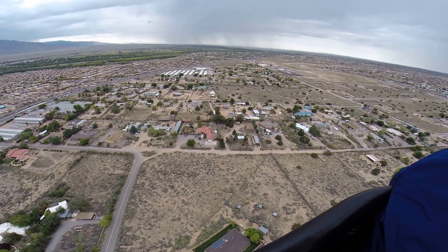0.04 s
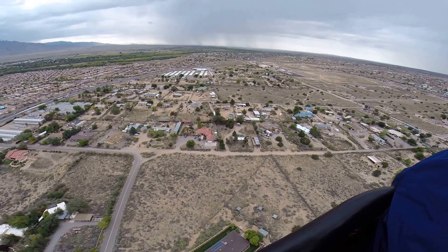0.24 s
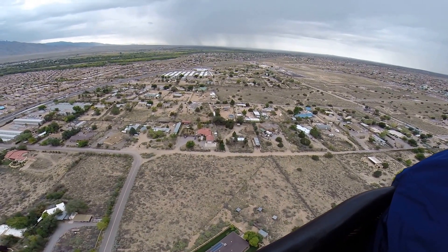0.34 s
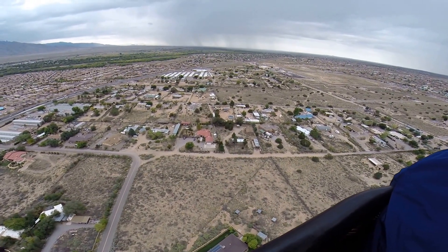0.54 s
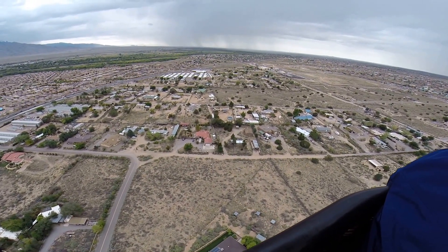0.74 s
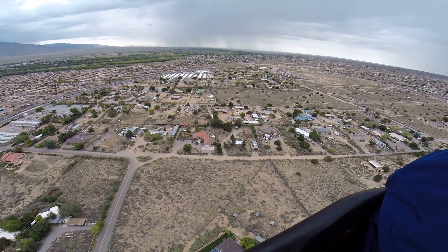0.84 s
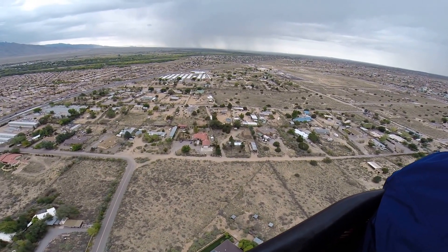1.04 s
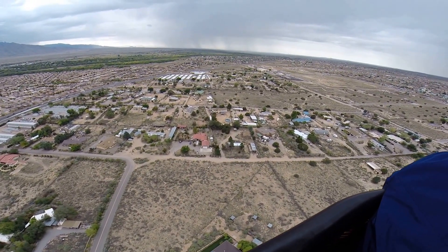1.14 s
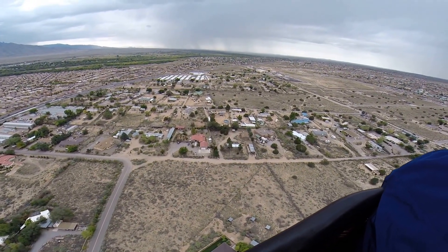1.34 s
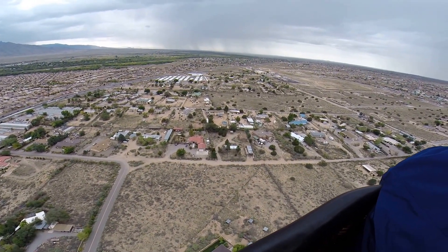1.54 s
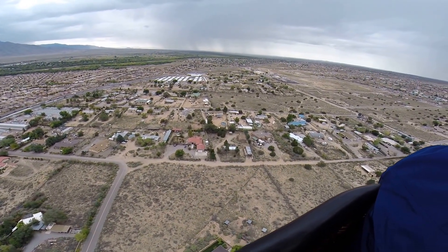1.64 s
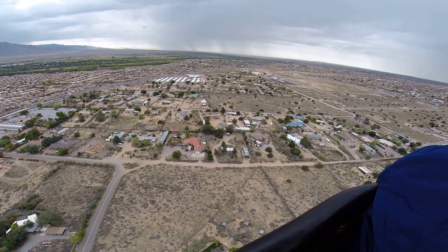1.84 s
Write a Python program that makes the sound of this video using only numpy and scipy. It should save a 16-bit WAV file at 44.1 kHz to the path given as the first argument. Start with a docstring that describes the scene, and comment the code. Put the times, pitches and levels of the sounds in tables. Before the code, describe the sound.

A balloon's propane burner catches with a deep whump after a brief soft rush, roars and hisses for just over a second, then shuts off, leaving quiet air; close microphone, outdoors high above open land.

```python
"""The propane burner of a hot-air balloon fires one blast above the basket, in open air.
First only the soft rush of pilot flame and air: flickering noise bands with low gusts. The valve opens and
the gas catches with a deep whump, pushes ringing in low modes. A turbulent flame roars (resonant noise), billows
(low noise) and booms (a wavering sine) under the jets' hiss (treble noise) until the valve shuts.
The soft rush is left, with a low gust and a faint rustle."""
import sys
import numpy as np
from scipy import signal
from scipy.io import wavfile

SR = 44100
rng = np.random.default_rng(int(sys.argv[2]) if len(sys.argv) > 2 else 0)


def wav_out(sig):
    """Save sig, one row per channel (or a flat mono array), as 16-bit PCM at SR to the path in sys.argv[1]."""
    wavfile.write(sys.argv[1], SR, np.round(np.clip(np.atleast_2d(sig).T, -1, 1) * 32767).astype(np.int16))


N = 83790   # samples, 1.9 s

# Spectrum of the roar. Each row: frequency in Hz, relative density in dB per Hz.
ROAR_SPECTRUM = [(60, -17), (95, -4.5), (140, 0), (280, -4.5), (450, -6), (700, -14), (950, -18),
                 (1250, -21.5), (2000, -32.5), (2500, -38), (4000, -41)]
# Peaks and dips from burner frame and basket. Each row: frequency in Hz, width in Hz, boost in dB.
FRAME_RESONANCES = [(138, 14, 1.5), (177, 32, 3.5), (222.7, 17, -11.5), (286, 49, 6), (341, 26.5, -6),
                    (368.3, 21.6, 5), (564, 12, 3), (645, 45, -4.5), (885, 120, 2.5), (1034, 60, -2),
                    (1401, 76, -3), (1420, 65, 2.5), (2020, 280, 4.5)]
ROAR_TRIM_DB, ROAR_PATCHY_DB = 1, 0
ROAR_FLUTTER_DB, ROAR_FLUTTER_HZ = 0.7, 37.7
ROAR_TILT_DB_PER_OCTAVE_PER_DB, ROAR_PIVOT_HZ = 0.099, 300


def roar(flame_db, flow_db):
    """Turbulent burning, brighter at high flow, coloured by resonances and reflections, fluttering as a whole."""
    tilt_db = ROAR_TILT_DB_PER_OCTAVE_PER_DB * excess(flow_db)
    burn = turbulence(ROAR_SPECTRUM, ROAR_PATCHY_DB, tilt_db, ROAR_PIVOT_HZ)
    burn = colour(burn, FRAME_RESONANCES)
    flutter_db = ROAR_FLUTTER_DB * drift(ROAR_FLUTTER_HZ)
    return rms_one(reflect(burn)) * from_db(ROAR_TRIM_DB + flame_db + flutter_db)


# Swells of the flame's lowest resonance. Each row: centre in seconds, length in seconds, peak level in dB rms.
BOOM_SWELLS = [(0.41, 0.057, -14), (0.604, 0.36, -24.5), (1.055, .07, -11.5), (1.125, 0.054, -13.5),
               (1.24, .04, -17)]
BOOM_HZ, BOOM_WANDER_HZ, BOOM_WANDER_RATE_HZ = 141, 5.4, 16.4
BOOM_FLUTTER_DB, BOOM_FLUTTER_HZ = 2.5, 23


def booms():
    """Now and then the flame locks onto its lowest resonance and swells into a wavering drone."""
    pitch_hz = BOOM_HZ + BOOM_WANDER_HZ * drift(BOOM_WANDER_RATE_HZ)
    drone = np.sqrt(2) * np.sin(2 * np.pi * np.cumsum(pitch_hz) / SR)   # rms 1
    flutter = from_db(BOOM_FLUTTER_DB * drift(BOOM_FLUTTER_HZ))
    return drone * swells(BOOM_SWELLS) * flutter


# Slow billowing of the flame. Each row: frequency in Hz, relative density in dB per Hz.
RUMBLE_SPECTRUM = [(15, -12), (28, -20), (48, -4), (65, -9), (90, -14.5), (160, -22)]
RUMBLE_PEAK_DB, RUMBLE_DB_PER_FLAME_DB = -26, 0.98


def rumble(flame_db):
    """The flame billows and shakes the air, following its strength."""
    level_db = RUMBLE_PEAK_DB + RUMBLE_DB_PER_FLAME_DB * (flame_db - flame_db.max())
    return turbulence(RUMBLE_SPECTRUM, patchy_db=1.5) * from_db(level_db)


# Spectrum of the jets. Each row: frequency in Hz, relative density in dB per Hz.
HISS_SPECTRUM = [(900, 1.5), (2000, -7), (2900, 0), (3650, -2), (5500, -1), (8000, -2), (11000, -5),
                 (15500, -6.5)]
# Colour of the nozzles. Each row: frequency in Hz, width in Hz, boost in dB.
NOZZLE_RESONANCES = [(3130, 310, -18), (3390, 135, 6)]
HISS_TRIM_DB, HISS_PATCHY_DB = 0.5, 1
HISS_FLUTTER_DB, HISS_FLUTTER_HZ = 0.5, 70
HISS_TILT_DB_PER_OCTAVE_PER_DB, HISS_PIVOT_HZ = 0.12, 5000


def jets(flow_db):
    """Propane hisses out of the nozzles with a fine sputter; a narrow resonance sings just above a dip."""
    tilt_db = HISS_TILT_DB_PER_OCTAVE_PER_DB * excess(flow_db)
    hiss = turbulence(HISS_SPECTRUM, HISS_PATCHY_DB, tilt_db, HISS_PIVOT_HZ)
    hiss = colour(hiss, NOZZLE_RESONANCES)
    flutter_db = HISS_FLUTTER_DB * drift(HISS_FLUTTER_HZ)
    return reflect(hiss) * from_db(HISS_TRIM_DB + flow_db + flutter_db)


# Puffs of gas catching fire. Each row: start in seconds, strength in dB.
IGNITION_PUFFS = [(0.2199, 4), (0.2251, -10), (0.332, -19)]
# What a puff rings with. Each row: frequency in Hz, gain in dB, T60 in seconds.
WHUMP_MODES = [(61, -5.5, 0.089), (123, -5.5, 0.045), (168, -7, 0.064), (327, -6, 0.019),
               (526, -27, 0.0054)]
PUFF_SOFTNESS_HZ = 474


def ignition():
    """Each puff is a soft pressure push that rings for a few deep cycles."""
    push = np.zeros(N) + 1e-18   # keeps the filters out of denormals
    for start_s, db in IGNITION_PUFFS:
        push[int(start_s * SR)] += from_db(db)
    push = signal.sosfilt(signal.butter(2, PUFF_SOFTNESS_HZ, fs=SR, output="sos"), push)
    whump = 0
    for hz, db, t60_s in WHUMP_MODES:
        r = np.exp(-np.log(1000) / (t60_s * SR))
        w = 2 * np.pi * hz / SR
        ring = signal.lfilter([0, np.sin(w)], [1, -2 * r * np.cos(w), r * r], push)
        whump = whump + from_db(db) * ring
    return whump


# Pilot flame and air. Each row: frequency in Hz, relative density in dB per Hz.
AIR_SPECTRUM = [(20, -10), (50, -2.5), (85, 4.5), (170, 3), (290, -13.5), (500, -5.5), (950, -8),
                (1700, -18.5), (2600, -33.5), (4000, -36.5), (8000, -43), (15000, -52)]
# Level of that rush. Each row: time in seconds, level in dB rms.
AIR_LEVEL_DB = [(0, -35), (0.19, -37), (1.62, -41.5), (1.79, -39.5), (1.9, -39.5)]
# Faint rustle. Each row: frequency in Hz, relative density in dB per Hz.
RUSTLE_SPECTRUM = [(1500, 0), (3000, 5), (4000, 3), (6000, -15), (10000, -5), (15000, -18)]
# Level of the rustle. Each row: time in seconds, level in dB rms.
RUSTLE_LEVEL_DB = [(1.68, -97), (1.79, -61), (1.83, -83), (1.89, -63)]
# Soft low gusts. Each row: frequency in Hz, relative density in dB per Hz.
GUST_SPECTRUM = [(40, -12), (75, 12), (130, 9), (190, -11), (280, -29)]
# Swells of the gusts. Each row: centre in seconds, length in seconds, peak level in dB rms.
GUST_SWELLS = [(0.185, 0.028, -29), (1.785, 0.047, -32)]


def air():
    """The soft, uneven rush of the pilot flame and the open air, with low gusts and a faint rustle late on."""
    rush = turbulence(AIR_SPECTRUM, patchy_db=1) * from_db(in_time(AIR_LEVEL_DB))
    rustle = turbulence(RUSTLE_SPECTRUM, patchy_db=2.5) * from_db(in_time(RUSTLE_LEVEL_DB))
    gusts = turbulence(GUST_SPECTRUM, patchy_db=-0.5) * swells(GUST_SWELLS)
    return rush + rustle + gusts


# Echoes from frame, tanks and basket. Each row: delay in ms, linear gain.
ECHOES = [(3.3, 0.068), (4.0, 0.051), (5.2, 0.05), (6.9, 0.088)]


def reflect(x):
    """Add the short reflections from around the burner."""
    n = np.arange(N)
    return x + sum(gain * np.interp(n - ms * SR / 1000, n, x, left=0) for ms, gain in ECHOES)


def colour(x, rows):
    """Boost or cut at each resonance in turn."""
    for hz, width_hz, boost_db in rows:
        x = x + (from_db(boost_db) - 1) * resonate(x, hz, width_hz)
    return x


def resonate(x, hz, width_hz):
    """A resonance with gain 1 on top."""
    r = np.exp(-np.pi * width_hz / SR)
    zeros = np.array([1, 0, -1]) * (1 - r * r) / 2
    poles = [1, -2 * r * np.cos(2 * np.pi * hz / SR), r * r]
    return signal.lfilter(zeros, poles, x)


def turbulence(spectrum, patchy_db, tilt_db=0, pivot_hz=1):
    """Third-octave noise bands, each flickering by patchy_db, tilted in dB per octave; rms 1."""
    points_hz, points_db = np.transpose(spectrum)
    edges_hz = 16 * 2 ** (np.arange(31) / 3)
    white = rng.standard_normal((2, N + SR // 2))   # neighbouring bands take different noise
    out = 0
    for k, (low, high) in enumerate(zip(edges_hz, edges_hz[1:])):
        hz = np.sqrt(low * high)
        sos = signal.butter(3, [low, high], "band", fs=SR, output="sos")
        band = signal.sosfilt(sos, white[k % 2])[-N:]   # skips the filter's start-up
        level_db = np.interp(np.log(hz), np.log(points_hz), points_db, left=-90, right=-90)
        flicker_db = patchy_db * drift(11.4)
        out = out + band * from_db(level_db + flicker_db + tilt_db * np.log2(hz / pivot_hz))
    return rms_one(out)


REFERENCE_FLOW_DB, TILT_RANGE_DB = -34, 22   # below this range the sound gets no duller


def excess(flow_db):
    """How far the flow is above the reference, in dB."""
    return np.maximum(flow_db - REFERENCE_FLOW_DB, -TILT_RANGE_DB)


def swells(rows):
    """A rounded rise and fall of gain for each centre, length and dB."""
    t = np.arange(N) / SR
    gain = 0
    for centre_s, length_s, db in rows:
        gain = gain + from_db(db) * np.cos(np.pi * np.clip((t - centre_s) / length_s, -.5, .5))
    return gain


def drift(hz):
    """Smooth random wandering at about this rate, spread 1, drawn every 40 samples."""
    r = np.exp(-2 * np.pi * hz * 40 / SR)
    noise = rng.standard_normal(N // 40 + 2002)
    slow = signal.lfilter([1], [1, -2 * r, r * r], noise)[2000:]
    return np.interp(np.arange(N) / 40, np.arange(len(slow)), rms_one(slow))


def in_time(rows):
    """A control curve at every sample."""
    return np.interp(np.arange(N) / SR, *np.transpose(rows))


def rms_one(x):
    """Scale to unit power."""
    return x / np.sqrt(np.mean(x ** 2) + 1e-20)


def from_db(db):
    """Decibels to gain."""
    return 10 ** (np.asarray(db) / 20)


# Strength of the flame. Each row: time in seconds, level in dB before the roar's trim.
FLAME_DB = [(0.195, -46), (0.218, -17.5), (0.255, -21.5), (0.3, -14.5), (0.385, -13.5), (0.6, -15),
            (0.79, -17), (0.93, -15.5), (1.11, -15.5), (1.2, -17.5), (1.38, -18.5), (1.467, -25),
            (1.5, -34.5), (1.57, -48)]
# Gas flow through the jets, as hiss level. Each row: time in seconds, level in dB before the hiss trim.
FLOW_DB = [(0.195, -66), (0.222, -43), (0.282, -34.5), (0.5, -32.3), (0.6, -32.5), (0.67, -35), (0.8, -37),
           (1.03, -36), (1.23, -39), (1.28, -40.5), (1.41, -43.5), (1.5, -59), (1.56, -100)]


def scene():
    """One blast over the quiet background."""
    flame_db, flow_db = in_time(FLAME_DB), in_time(FLOW_DB)
    flame = roar(flame_db, flow_db) + booms() + rumble(flame_db)
    return (flame + jets(flow_db) + ignition() + air())[None]


LOW_CUT_HZ, HIGH_CUT_HZ, CEILING = 20, 15250, 1.0


def record(dry):
    """The deepest bass is lost, the highest peaks are rounded off and the top is cut steeply."""
    dry = signal.sosfilt(signal.butter(2, LOW_CUT_HZ, "high", fs=SR, output="sos"), dry)
    rounded = dry / (1 + (dry / CEILING) ** 6) ** (1 / 6)
    return signal.sosfilt(signal.ellip(16, .1, 90, HIGH_CUT_HZ, fs=SR, output="sos"), rounded)


dry = scene()
out = record(dry)
wav_out(out)
```